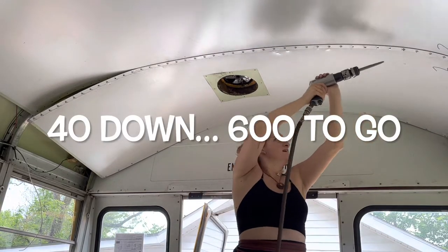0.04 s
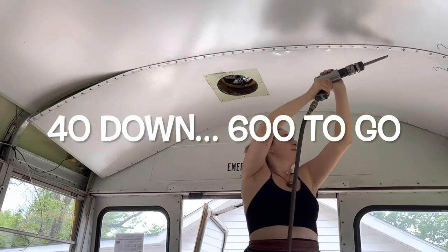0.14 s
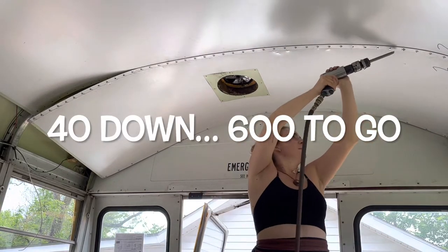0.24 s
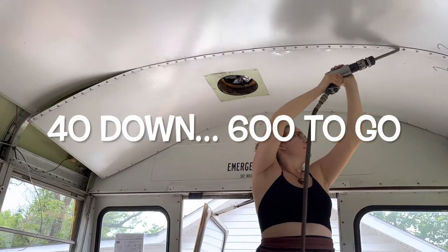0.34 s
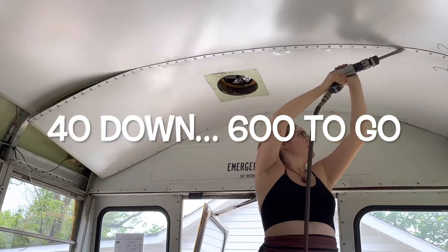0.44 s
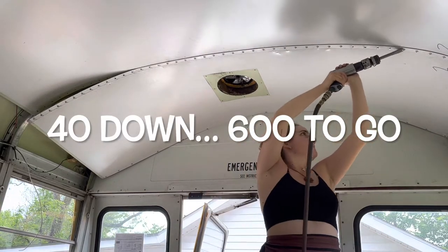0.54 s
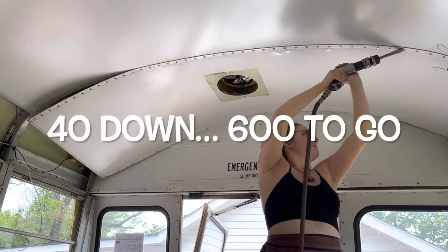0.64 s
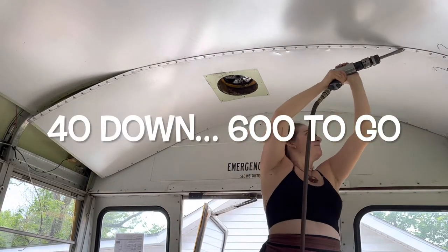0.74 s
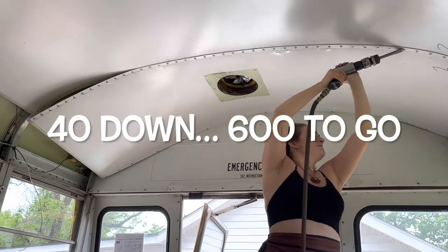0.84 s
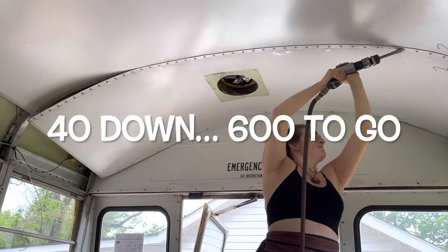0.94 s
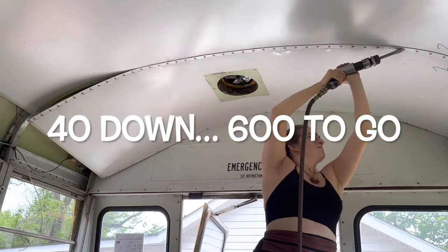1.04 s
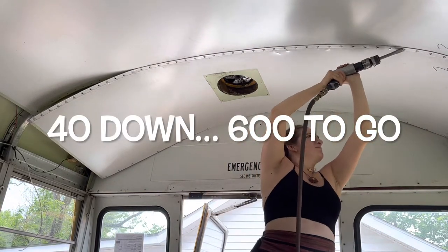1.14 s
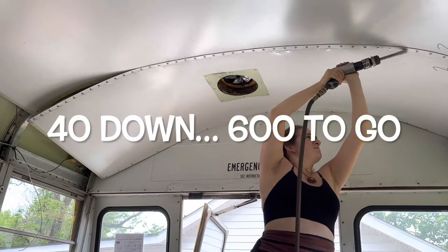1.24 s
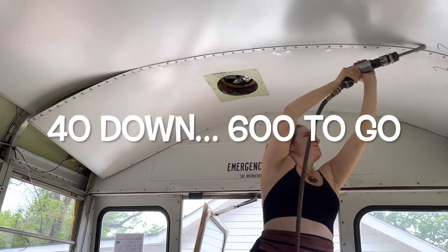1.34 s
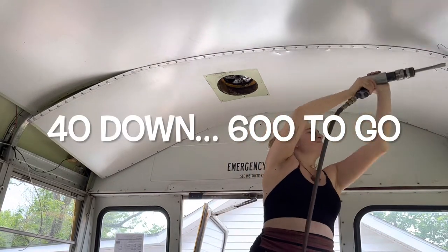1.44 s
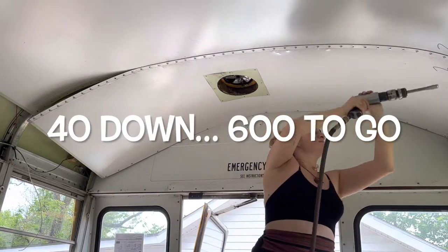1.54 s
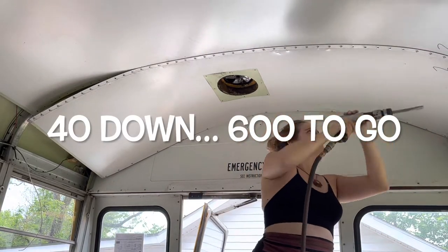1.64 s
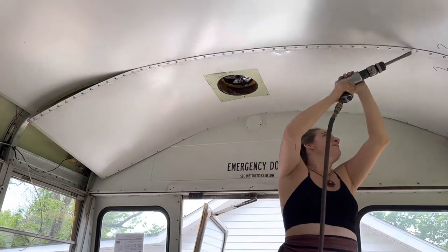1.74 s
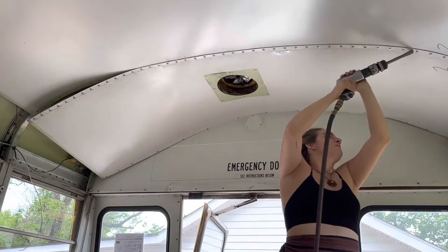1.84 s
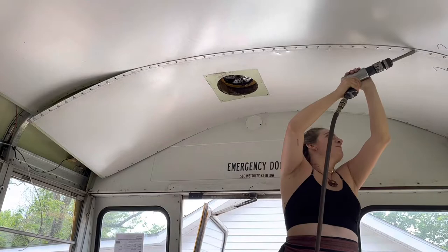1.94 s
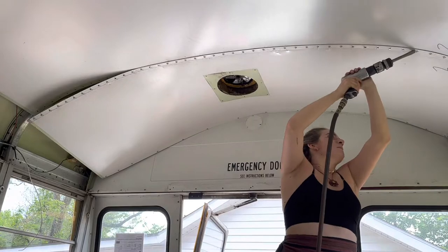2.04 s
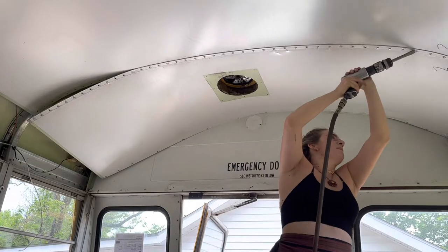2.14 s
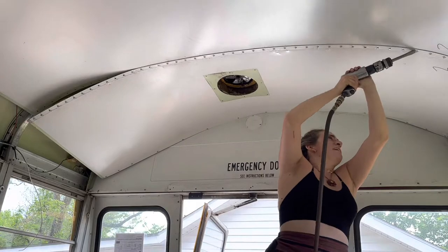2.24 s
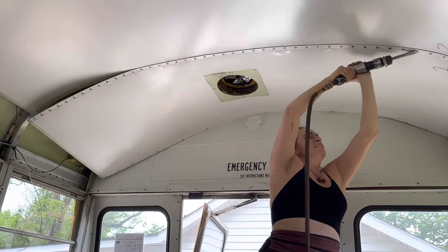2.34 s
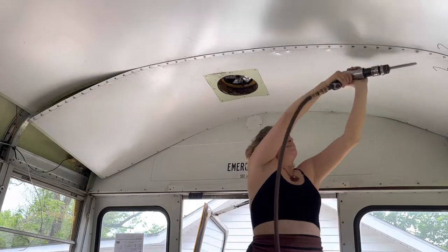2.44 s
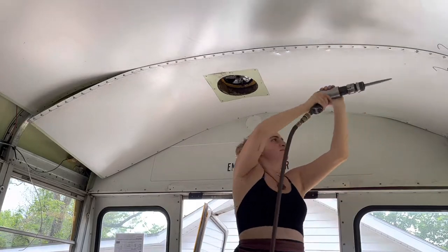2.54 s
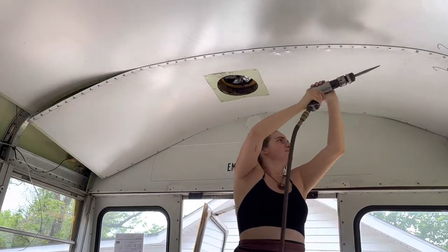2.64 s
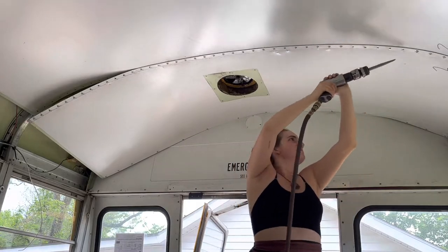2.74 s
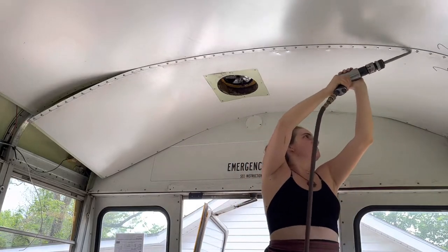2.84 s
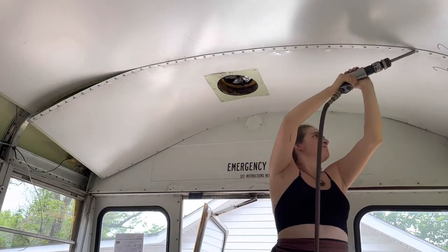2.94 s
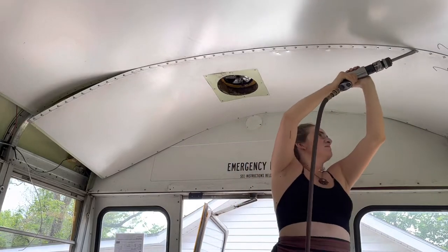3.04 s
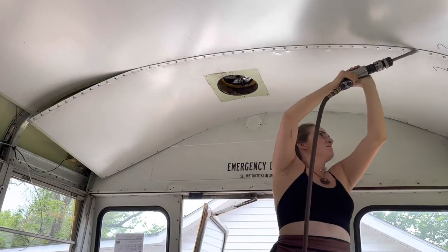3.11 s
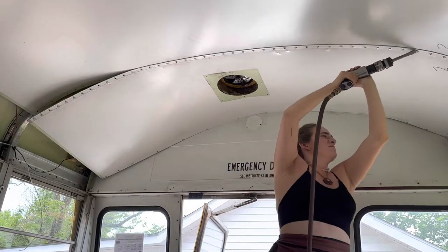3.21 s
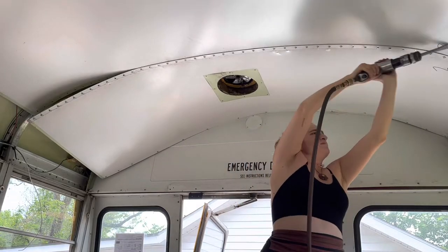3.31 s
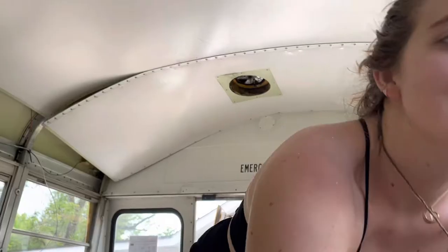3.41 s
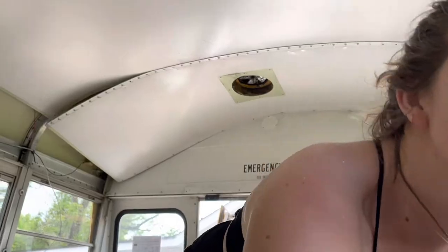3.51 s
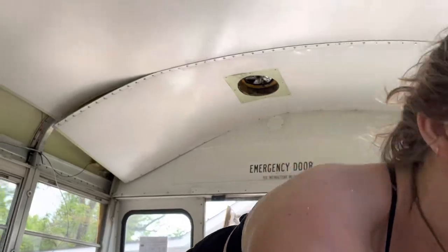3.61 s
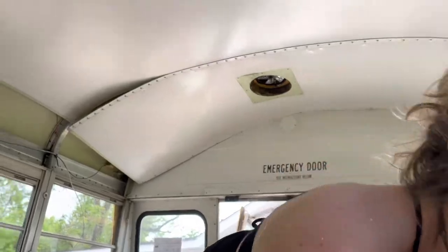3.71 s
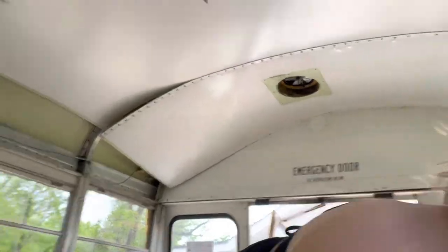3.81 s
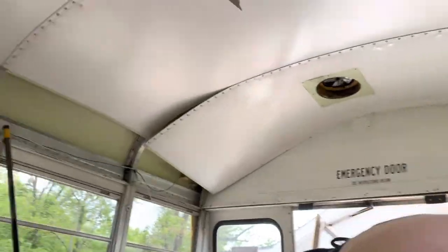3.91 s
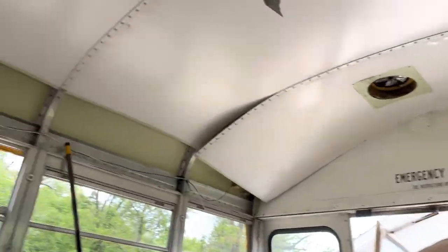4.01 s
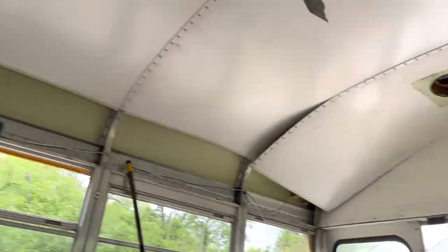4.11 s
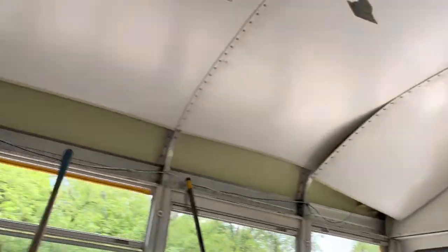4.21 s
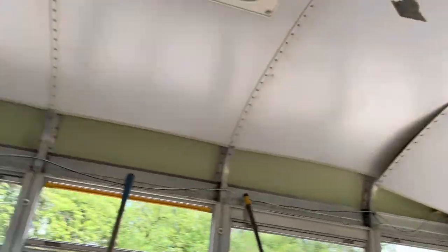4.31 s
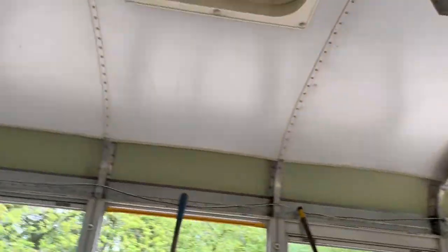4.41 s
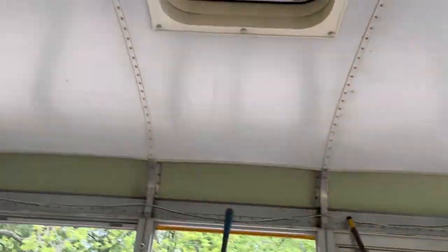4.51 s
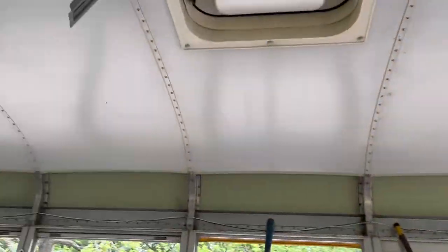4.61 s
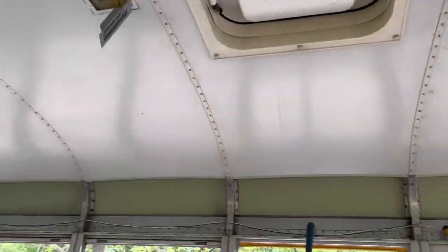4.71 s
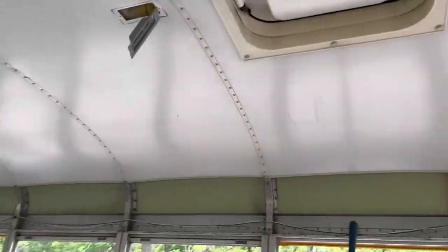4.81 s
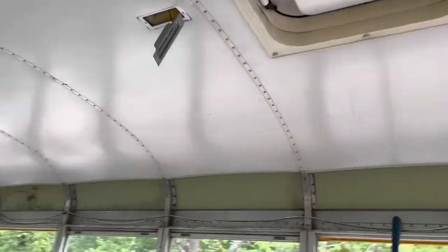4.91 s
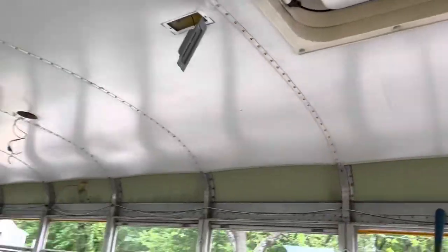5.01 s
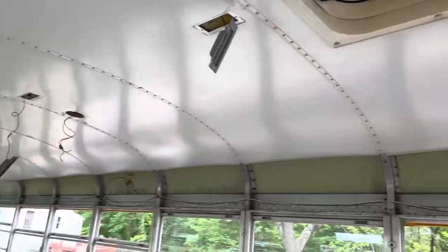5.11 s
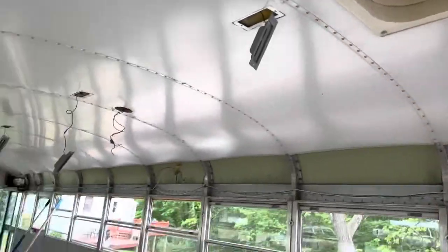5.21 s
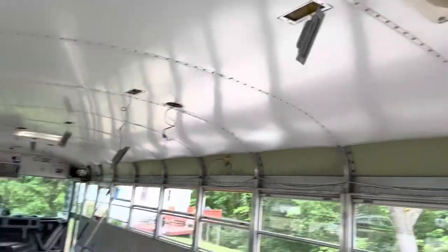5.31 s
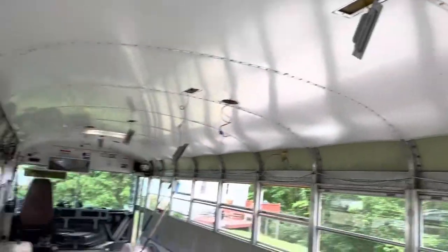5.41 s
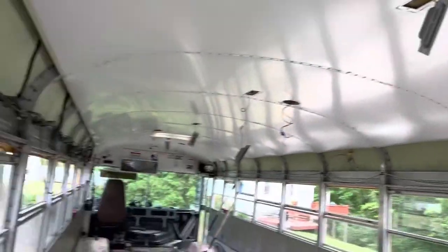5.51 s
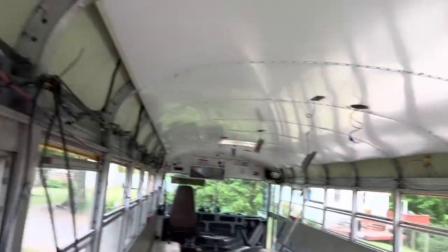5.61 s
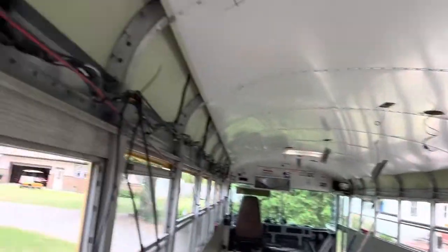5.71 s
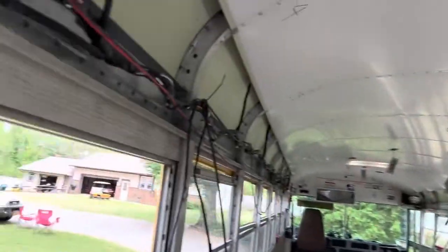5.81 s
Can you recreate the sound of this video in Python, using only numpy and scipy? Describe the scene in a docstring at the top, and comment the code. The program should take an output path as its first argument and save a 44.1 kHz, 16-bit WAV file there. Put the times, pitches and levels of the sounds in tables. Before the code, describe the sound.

Inside a stripped steel bus, an air hammer hammers the roof in three short bursts, followed by heavy clattering footsteps on the floor.

```python
"""Faint hum, grainy rustle and thin tones come first, with soft hose bumps, inside a stripped steel bus.
An air hammer then fires three short bursts against the roof, a few metres from the phone's two ports.
Its blows excite roof bands and falling dent tones; filtered noise makes the air, rustle and rumble.
The chisel taps the panel between bursts, a compressor throbs outside, and feet thud on the floor.
The sound drops out briefly twice."""
import sys
import numpy as np
from scipy import signal
from scipy.fft import rfft, irfft, next_fast_len
from scipy.io import wavfile
from scipy.ndimage import uniform_filter1d

SR = 44100
rng = np.random.default_rng(int(sys.argv[2]) if len(sys.argv) > 2 else 0)


def unload_audio(sound):
    """Save the sound as a 16-bit wav file, at the path given as the first command line argument."""
    columns = np.transpose(np.atleast_2d(sound))
    # keep every value between -1 and 1, then stretch to whole-number steps
    steps = np.round(np.clip(columns, -1, 1) * 32767)
    wavfile.write(sys.argv[1], SR, steps.astype(np.int16))


N = 258293
SIZE = next_fast_len(N + SR)  # FFT length, padded so that tails do not wrap
HZ = np.maximum(np.arange(SIZE // 2 + 1) * SR / SIZE, 1.)
T = np.arange(N) / SR

# Cabin layers over time: start_s, hum_db, rumble_db, rustle_db
CABIN_LEVELS = [(0, -66, -75, -67.5), (0.35, -71, -91, -74.5), (0.45, -65, -64, -69),
                (0.65, -59, -76, -77.5), (1.0, -51.5, -93, -75), (1.72, -57.5, -59, -101),
                (1.85, -73, -56, -67), (1.95, -67, -35.5, -63.5), (2.14, -58, -50.5, -62),
                (2.55, -68.5, -72.5, -66), (2.7, -70.5, -78, -73.5), (2.88, -62, -61, -73),
                (3.06, -44, -71, -81.5), (3.18, -53.5, -60, -61), (3.39, -60.5, -64.5, -73),
                (3.6, -60.5, -60, -76.5), (3.82, -47.5, -45.5, -65), (4.1, -62, -55.5, -74),
                (4.22, -55, -69, -60.5), (4.33, -63.5, -61, -72), (4.5, -67.5, -58.5, -71.5),
                (5.03, -50, -73, -74.5), (5.2, -44.5, -57.5, -53.5), (5.4, -39.5, -43, -58.5),
                (5.65, -51, -59, -69), (5.74, -36, -48, -46), (5.86, -60, -48, -48.5)]
# Heavy steps shaking the floor: start_s, hum_db, rumble_db, scuff_db, rise_s, t60_s
FLOOR_STEPS = [(3.89, -59, -40, -59, 0.015, 0.74), (4.555, -18, -14.5, -65, 0.037, 0.68)]
# Resonances of the hum: pitch_hz, width_hz, relative_db
HUM_MODES = [(73, 22, -5.5), (101, 17, -3.5)]
# Resonances of the rumble: pitch_hz, width_hz, relative_db
RUMBLE_MODES = [(128, 67, -1), (221, 194.5, 1), (276, 267, -2.5)]
# Spectrum of clothes, hose and soles: pitch_hz, relative_db_per_hz
RUSTLE_SPECTRUM = [(150, -4), (300, -8.5), (600, -12), (2000, -11.5), (4800, -16), (7500, -26.5),
                   (10000, -22.5), (12500, -31), (14500, -50)]
# Thin wavering tones: start_s, end_s, pitch_hz, level_db
FAINT_TONES = [(-.1, .36, 533, -81), (-.1, .4, 721, -82), (4.375, 4.55, 985, -70)]

# Soft hose bumps: start_s, click_db, then tail_db, thump_db, ring_db (re click), t60_s, ring_hz
HOSE_BUMPS = [(0.332, -80, 13, 4, 22, 0.5, 540), (0.396, -63, 3, -8, 2, 0.27, 1380),
              (0.431, -70, 12, -4, 16, 0.6, 920), (0.55, -82, 14, -15, 12, 0.5, 900)]
# Chisel and hose against the roof, same columns: start_s, click_db, tail_db, thump_db, ring_db, t60_s, ring_hz
ROOF_TAPS = [(1.052, -68, 6.5, -12.5, -10, 1.2, 1900), (1.076, -48.5, 3.5, -5, 13, 1.2, 810),
             (1.764, -43, -5, -2.5, 14.5, 0.25, 1160), (1.91, -41.5, 0.5, -7.5, 10.5, 0.37, 1030),
             (1.952, -38, -10.5, 5, 9, 0.17, 650), (2.556, -50, 8, -12, -15.5, 0.13, 1042),
             (2.846, -58, 7.5, -11, -13, 0.24, 1080), (2.877, -46.5, 4.5, -22, -15, 0.21, 1030),
             (2.95, -44.5, -2, -18, 2, 0.37, 4700), (3.041, -46.5, -8.5, -19, -8, 0.4, 1040)]
# Feet and hands on floor and fittings: start_s, click_db, tail_db, thump_db, ring_db, t60_s, ring_hz
FLOOR_KNOCKS = [(3.498, -72, 4, 10, -5, 0.35, 1850), (3.655, -38.5, -8, -11.5, -30, 1, 1400),
                (3.809, -55, 4.5, -13, -12, 0.89, 2060), (3.892, -25, -0.5, -1, -8, 0.46, 1220),
                (4.551, -44, 14, -7, 15.5, 0.4, 1600), (4.57, -29.5, 0, 3, 11.5, 0.35, 1590),
                (4.624, -34.5, 7.5, -4, 7, 0.64, 1510), (4.837, -41.5, -18, -7, -9, 0.12, 2900),
                (5.063, -51.5, 4, 23, 14, 0.071, 514), (5.084, -45.5, -4.5, -7, -19.5, 0.15, 1390),
                (5.156, -37, -12.5, -16, -6, 0.11, 3420), (5.317, -54.5, 2, -13, 0.5, 0.44, 1970),
                (5.436, -38.5, -7, -24, 0.5, 0.31, 1360)]
# Tail of a bumped roof: pitch_hz, relative_db_per_hz
BUMP_SPECTRUM = [(300, -14), (600, -3), (950, 0), (1500, -11), (3000, -19), (10000, -30)]
# Tail of a tapped roof, and the click of every strike: pitch_hz, relative_db_per_hz
TAP_SPECTRUM = [(300, -14.5), (700, -6), (1100, -3.5), (2000, -4), (5000, -17.5), (10000, -23.5),
                (14500, -26)]
# Tail of a knocked floor: pitch_hz, relative_db_per_hz
KNOCK_SPECTRUM = [(200, -6.5), (400, 3.5), (900, 0), (1600, -6), (3500, -12.5), (6000, -17.5), (9000, -27),
                  (12500, -22.5), (14000, -47)]
# Roof panel under taps and bumps: pitch_hz, width_hz, relative_db
PANEL_MODES = [(540, 30, -0.5), (714, 36, 1), (920, 52, 1), (1390, 43, -4.5), (2200, 61, -8.5)]
# Floor panels: pitch_hz, width_hz, relative_db
FLOOR_MODES = [(484, 9, -12.5), (787, 17, 11), (1010, 18, -17.5), (1560, 44, -7), (2450, 35, -29),
               (2750, 37, -3), (3420, 170, -4)]
# Loose metal trim answering each strike: pitch_hz, width_hz, relative_db
FITTING_MODES = [(4200, 390, 2.5), (10400, 240, -5.5), (12300, 300, -2.5)]
# Jolts of the loose trim: start_s, level_db, t60_s
TRIM_JOLTS = [(0.398, -55.5, 0.27), (3.895, -63, 0.28), (4.56, -41.5, 0.82)]
# Narrow bands of the shivering trim: pitch_hz, width_hz, relative_db
TRIM_MODES = [(4710, 110, 6), (7340, 190, 4), (9320, 86, 13), (12660, 120, 4)]

# Trigger pulls: air_opens_s, first_blow_s, last_blow_s
TRIGGER_TIMES = [(1.113, 1.136, 1.432), (2.153, 2.164, 2.402), (3.188, 3.2005, 3.276)]
# Bursts: strokes_per_s, return_stroke_db, clean_share (0-1), dent_hz, lead_in_db (before each
# layer's share), lead_in_rise_db_per_s
BURST_SETTINGS = [(99.2, -11, 0.56, 770, -29.5, 15.5), (93.65, -0.5, 0.61, 1050, -27, 499.5),
                  (91.95, -0.5, 0.74, 1200, -30, 398)]
# Roof resonances: pitch_hz, width_hz, relative_db
ROOF_MODES = [(464, 63, -2.5), (861, 54, 0), (900, 32, -3.5), (1176, 71, 4), (1220, 220, -6),
              (2090, 87, -8.5), (2540, 120, -2.5)]
# Sheet under the first, second and third rivet: pitch_hz, relative_db_per_hz
FIRST_SPECTRUM = [(150, -43), (250, -5), (378, -6), (524, -0.5), (800, 5.5), (1660, -8.5), (1930, -5),
                  (5000, -48.5), (6500, -41.5), (11000, -120)]
SECOND_SPECTRUM = [(150, -20), (250, -7), (726, -6.5), (1140, -5.5), (1700, -7.5), (3990, -13.5),
                   (5000, -16.5), (6500, -45), (11000, -120)]
THIRD_SPECTRUM = [(150, -39.5), (250, -18), (579, 0.5), (656, -1), (1340, -3), (2570, -5.5), (5000, -8),
                  (6500, -43.5), (11000, -120)]
# Steady bands of the sheet, one list a rivet: pitch_hz, width_hz, relative_db
SHEET_BANDS = [
    [(274, 33, -10.5), (407, 31, -6.5), (529, 30, 5.5), (635, 20, -13), (780, 25, 0.5), (920, 12, -11),
     (1738, 50, -3.5), (2100, 50, 0)],
    [(270, 35, -3.5), (466, 32, -4.5), (860, 36, -4.5), (964, 40, 1.5), (1186, 18, 4), (1295, 20, 3.5),
     (1370, 45, -0.5)],
    [(690, 25, -1), (981, 61, 6), (1370, 80, -2.5), (2180, 130, -7.5)],
]
# Share of those bands, one value a rivet: relative_db
SHEET_BAND_DB = [-10, -7, -6]
# Low boom behind the roof: pitch_hz, width_hz, relative_db
BOOM_MODES = [(96, 250, -3.5), (139, 100, 2.5), (181, 51, -0.5), (286, 120, -1.5)]
# Spectrum of the escaping air: pitch_hz, relative_db_per_hz
AIR_SPECTRUM = [(300, -30.5), (1000, -0.5), (2000, -0.5), (4500, -1), (7000, -4), (11000, -4.5),
                (14500, -6), (16000, -20.5)]
# Roof, boom and air, one row a burst: settled_db, first_blows_extra_db, t60_s (after the last blow)
ROOF_EFFORT = [(-35.5, 17.5, 0.56), (-17, 2, 0.095), (-28.5, 11.5, 0.3)]
BOOM_EFFORT = [(-49.5, 24.5, 0.31), (-20, 1, 0.06), (-29, -14, 0.31)]
AIR_EFFORT = [(-25, 9.9, 0.41), (-20, 2.7, 0.22), (-19, 2, 0.65)]
# Short falling tones of hammer blows, a knock, a bump and a floor thud:
# start_s, peak_db (before decay), settled_hz, decay_s
FALLING_TONES = [(1.114, -20, 328, 0.0092), (1.1365, -9.5, 690, 0.0023), (1.1445, -2.5, 250, 0.0043),
                 (1.2265, -3.5, 509, 0.0035), (1.952, -23.5, 403, .014), (2.171, -7, 384, .003),
                 (2.2015, -7.5, 328.5, .003), (2.2132, -6.5, 299.4, 0.0025), (3.201, -8, 900, .004),
                 (3.2433, -8.5, 1250, .002), (4.586, -15, 139, 0.0092), (5.162, -37.5, 478, 0.0044)]
# Multiples 4, 5, 6 ... of the tool's cycle: relative_db
DRONE_MULTIPLES = [-52, -47, -40, -47, -45, -41, -39, -36, -41, -43, -40, -46, -45, -41]
# Compressor over time: start_s, level_db
COMPRESSOR_LEVELS = [(1.74, -52.5), (1.783, -36.5), (2.0, -36), (2.3, -37.5), (2.5, -54.5), (2.82, -53.5),
                     (2.95, -39), (3.2, -39.5), (3.3, -59.5)]
# Compressor tank: pitch_hz, width_hz, relative_db
TANK_MODES = [(161.1, 7, 8), (204, 94, -14.5), (101.5, 9.4, -22)]
# Motor whine: pitch_hz, level_db
MOTOR_TONES = [(1247, -82), (1867, -86)]
# Modes of a steel frame on the floor: pitch_hz, relative_db, t60_s
FRAME_MODES = [(221, -1.5, .5), (447, -2, .4), (877, -5, .25), (1174, -13, .2), (1308, -14, .2),
               (1529, -12, .14), (2250, -17, .16), (2449, -14, .18), (2690, -14, .15), (2869, -17, .15),
               (3252, -15, .14), (3537, -15, .14), (3978, -16, .13)]
# Kicks at the frame: start_s, level_db
FRAME_KICKS = [(3.893, -26), (3.906, -25)]

# Stretches between dropouts: back_s, full_s, fade_starts_s, silent_s, phase_column
HEARD_STRETCHES = [(-1, -.5, 1.69, 1.73, 1), (1.73, 1.75, 3.33, 3.365, 2), (3.35, 3.38, 6, 7, 1)]
# The two microphone ports: pitch_hz, likeness (-1 to 1)
PORT_LIKENESS = [(60, .975), (250, .9), (450, .74), (750, .45), (1200, .1), (2200, 0), (4000, .05),
                 (6000, .42), (8000, .75), (9000, .72), (12000, .5), (15000, .8)]
# Phase by which left leads: pitch_hz, outer_stretches_rad, middle_stretch_rad
PORT_PHASE = [(0, 0, 0), (1300, 0, 0), (3600, .5, -.5), (5000, .5, .5), (6700, -1.1, .5), (7750, -3.14, 0),
              (8900, -3.14, .5), (11100, -6.2, -1), (13000, -6.4, -1), (14600, -9.2, -3),
              (16000, -9.5, -3.2)]

SETTLE_S, BITE_S = 0.11, 0.0022  # the tool settles on the rivet; the first blows build up
LEAD_ROOF_DB, LEAD_BOOM_DB, LEAD_AIR_DB = 2.5, -7, 0.5  # layer shares between trigger and first blow
LINGER_DB, LINGER_T60_S = -21.5, 0.49  # slower second part of each decay
REBOUND_S, REBOUND_DB, REBOUND_PITCH = 0.00454, -4, .72  # a later, lower dent tone; pitch is a ratio
DENT_S, DENT_SCATTER, DENT_SAG = .0019, .16, .3  # decay; pitch scatter in log units; starting sharpness
WHISTLE_HZ, WHISTLE_WIDTH_HZ = 1918, 70
WHISTLE_DB, WHISTLE_RISE_DB_S, WHISTLE_T60_S = -26, 70, .36
CYCLE_HZ = 49.9
DRONE_DB, DRONE_FROM_S, DRONE_RISE_S, DRONE_T60_S = 1.5, 1.2, .06, 0.19
PISTON_HZ = 22.38
FRAME_RATTLE_DB = 3.5
CABIN_T60_S, CABIN_WET_DB = 0.12, -5.5
TOP_HZ = 15800


def undb(db):
    """Decibels to gain."""
    return 10 ** (np.asarray(db) / 20)


def unit(x):
    """Scale to rms 1."""
    return x / np.sqrt(np.mean(x ** 2))


def along(table):
    """Read a (pitch_hz, value) table at every bin, straight on a log axis."""
    points = np.array(table)
    return np.interp(np.log(HZ), np.log(np.maximum(points[:, 0], 1.)), points[:, 1])


def ring(x, modes):
    """Pass a sound through two-pole resonances summed with alternating sign."""
    gain = 0
    for k, (hz, width, db) in enumerate(modes):
        band = 1j * HZ * width
        gain = gain + (-1) ** k * undb(db) * band / (hz ** 2 - HZ ** 2 + band)
    return irfft(rfft(x, SIZE) * gain, SIZE)[:len(x)]


def colour(x, table):
    """Causal (minimum-phase) filter with the given spectrum, from the folded cepstrum."""
    cepstrum = irfft(along(table) * np.log(10) / 20, SIZE)
    cepstrum[1:SIZE // 2] *= 2
    cepstrum[SIZE // 2 + 1:] = 0
    return irfft(rfft(x, SIZE) * np.exp(rfft(cepstrum)), SIZE)[:len(x)]


def shaped(x, table):
    """Colour that keeps the level of white noise."""
    return colour(x, table) / np.std(colour(rng.standard_normal(N), table))


def gains(table, column):
    """A dB column of a timed table as a gain curve, all but silent outside it."""
    points = np.array(table)
    return undb(np.interp(T, points[:, 0], points[:, column], -200, -200))


def walk(rate):
    """Random levels held 1 / rate s and slewed; spread near 1."""
    hold = int(SR / rate)
    held = np.repeat(rng.standard_normal(N // hold + 1), hold)
    return np.sqrt(3 / 2) * uniform_filter1d(held, hold)[:N]


def dying(since, t60):
    """Gain 1 until a moment, then 60 dB less every t60 s."""
    return undb(-60 * np.maximum(since, 0) / max(t60, .01))


def restless(column):
    """Level of one cabin layer: its slow curve plus the shudder after each heavy step."""
    level = gains(CABIN_LEVELS, column)
    for step in FLOOR_STEPS:
        since = T - step[0]
        level = level + undb(step[column]) * np.tanh(np.maximum(since, 0) / step[4]) * dying(since, step[5])
    return level


def cabin():
    """Hum and rumble of the body in the breeze; grainy rustle of clothes, hose and soles."""
    hum = unit(ring(ring(rng.standard_normal(N), HUM_MODES), [(86, 160, 0)]))
    rumble = unit(ring(ring(rng.standard_normal(N), RUMBLE_MODES), [(200, 750, 0)]))
    rustle = unit(colour(rng.standard_normal(N), RUSTLE_SPECTRUM)) * undb(2 * walk(70))
    return hum * restless(column=1) + rumble * restless(column=2) + rustle * restless(column=3)


def tones():
    """Thin sine tones of wavering level that come and go softly."""
    out = np.zeros(N)
    for start, end, hz, db in FAINT_TONES:
        edges = np.clip(np.minimum(T - start, end - T) / 0.015, 0, 1)
        out += np.sqrt(2) * np.sin(2 * np.pi * hz * T) * undb(db + 2 * walk(20)) * edges
    return out


def strikes(table, body, modes, click_s, thump_hz, thump_width, ring_width):
    """Each strike: a click with a noisy tail, a thump in the body and a brief ring at its own pitch."""
    click, crack, pitched = np.zeros(N), np.zeros(N), np.zeros(N)
    t = T[:SR]
    for s, db, tail_db, thump_db, ring_db, t60, ring_hz in table:
        i = int(s * SR)
        fade = dying(t, t60)
        noise = rng.standard_normal((2, len(t)))
        boards = [signal.lfilter(*signal.iirpeak(k * thump_hz, thump_hz / thump_width, SR), noise[1])
                  for k in (1, 2.1)]
        thump = unit(boards[0] + undb(-11.5) * boards[1])
        # the body takes a few cycles to swing up
        thump = undb(thump_db) * thump * fade * np.tanh(t * thump_hz / 2)
        bell = np.exp(-np.pi * ring_width * t) * np.sin(2 * np.pi * ring_hz * t) * np.tanh(t / 0.00054)
        contact = noise[0] * t / click_s * np.exp(1 - t / click_s)
        tail = noise[0] * fade * np.tanh(t / 0.0085)
        click[i:i + SR] += (undb(db) * contact)[:N - i]
        crack[i:i + SR] += (undb(db + tail_db) * tail)[:N - i]
        pitched[i:i + SR] += (undb(db) * (thump + undb(ring_db) * bell))[:N - i]
    fittings = undb(-17.5) * ring(crack, FITTING_MODES)
    panels = undb(1.0) * ring(crack, modes)
    return shaped(click, TAP_SPECTRUM) + shaped(crack, body) + fittings + panels + pitched


def bumps():
    """The hose bumps the roof softly, with a long narrow ring."""
    return strikes(HOSE_BUMPS, BUMP_SPECTRUM, PANEL_MODES, click_s=0.002, thump_hz=540,
                   thump_width=20, ring_width=14)


def trim():
    """Loose trim shivers in narrow high bands after a jolt."""
    shake = np.zeros(N)
    for s, db, t60 in TRIM_JOLTS:
        shake += undb(db) * np.tanh(np.maximum(T - s, 0) / 0.012) * dying(T - s, t60)
    return unit(ring(rng.standard_normal(N), TRIM_MODES)) * shake


def taps():
    """Chisel and hose tap the roof: sharp contact on a thin panel."""
    return strikes(ROOF_TAPS, TAP_SPECTRUM, PANEL_MODES, click_s=0.00096, thump_hz=456,
                   thump_width=26, ring_width=130)


def effort(rows, lead_db):
    """Gain of each burst: a soft lead-in, hard first blows that settle, a decay in two slopes."""
    out = []
    for (opens, start, stop), burst, (db, first_db, t60) in zip(TRIGGER_TIMES, BURST_SETTINGS, rows):
        lead_in_db, rise_db_s = burst[4:]
        since = np.maximum(T - start, 0)
        settling = np.exp(-np.minimum(since, stop - start) / SETTLE_S)
        held = undb(db + first_db * settling) * np.tanh(since / BITE_S)
        decay = np.hypot(dying(T - stop, t60), undb(LINGER_DB) * dying(T - stop, LINGER_T60_S))
        lead = undb(lead_db + lead_in_db + rise_db_s * np.clip(T - opens, 0, start - opens))
        lead = lead * (T > opens) * dying(T - start, 0.018)
        # the next dropout ends the burst
        cut = min(silent for _, _, _, silent, _ in HEARD_STRETCHES if silent > start)
        out.append(np.hypot(held * decay, lead) * (T < cut))
    return out


def hammer_blows():
    """Uneven blows and return strokes, the quivering dents they leave, and the share of clean blows."""
    blows, share, dents = np.zeros(N), np.zeros(N), np.zeros(N)
    t = T[:SR // 20]
    sagging = t * (1 + DENT_SAG * np.exp(-t / DENT_S))  # each dent starts sharp and falls in pitch
    quivers = (0, 0, 1), (int(REBOUND_S * SR), REBOUND_DB, REBOUND_PITCH)  # delay, dB, pitch ratio
    for (_, start, stop), (rate, back_db, clean, dent_hz, _, _) in zip(TRIGGER_TIMES, BURST_SETTINGS):
        chance = rng.standard_normal((60, 3))
        k = np.arange(len(chance))
        s = start + (k + .05 * chance[:, 0] * (k > 0)) / rate
        keep = s < stop
        at = (s[keep] * SR).astype(int)
        # every second stroke is a return stroke
        blows[at] = undb(back_db * (k % 2) + 2.4 * chance[:, 1])[keep]
        for i, hz in zip(at, dent_hz * np.exp(DENT_SCATTER * chance[:, 2])):
            for late, db, pitch in quivers:
                quiver = np.exp(-t / DENT_S) * np.sin(2 * np.pi * pitch * hz * sagging)
                dents[i + late:i + late + len(t)] += blows[i] * undb(db) * quiver
        share += clean * (T > start) * (T < stop + 1 / rate)
    return blows, np.clip(share, 0, 1), dents


def whistle():
    """A narrow band of noise swells up to the first burst's last blow, then dies away."""
    opens, start, stop = TRIGGER_TIMES[0]
    since = T - stop
    level = undb(WHISTLE_DB + WHISTLE_RISE_DB_S * np.minimum(since, 0)) * dying(since, WHISTLE_T60_S)
    sounding = (T > start) * (T < HEARD_STRETCHES[0][3])
    return unit(ring(rng.standard_normal(N), [(WHISTLE_HZ, WHISTLE_WIDTH_HZ, 0)])) * level * sounding


def hammer():
    """Blows and return strokes ring the roof, loose sheets rattle, air puffs out at every stroke."""
    blows, share, dents = hammer_blows()
    # each blow is a short ragged contact: the bit chatters for a few ms
    chatter = signal.lfilter([1], [1, -np.exp(-1 / (0.0037 * SR))], blows)
    contact = chatter / np.sqrt(uniform_filter1d(chatter ** 2, SR // 30) + 1e-6)
    # clean blows pulse the noise; the rest is a continuous rattle
    drive = (share * contact + np.sqrt(1 - share ** 2)) * rng.standard_normal(N)
    modes = undb(-8.0) * unit(ring(drive, ROOF_MODES)) + undb(18.0) * share * dents
    spectra = FIRST_SPECTRUM, SECOND_SPECTRUM, THIRD_SPECTRUM
    roof = np.zeros(N)
    for spectrum, bands, band_db, gain in zip(spectra, SHEET_BANDS, SHEET_BAND_DB,
                                              effort(ROOF_EFFORT, LEAD_ROOF_DB)):
        sheet = unit(colour(drive, spectrum)) + undb(band_db) * unit(ring(drive, bands))
        roof += (modes + sheet) * gain
    boom = unit(ring(ring(drive, BOOM_MODES), [(168, 170, 0)])) * sum(effort(BOOM_EFFORT, LEAD_BOOM_DB))
    puff = 0.5 * share * contact + np.sqrt(1 - (1.3 * share) ** 2)
    flow = sum(effort(AIR_EFFORT, LEAD_AIR_DB))
    air = puff * unit(colour(rng.standard_normal(N), AIR_SPECTRUM)) * flow
    return roof + boom + air + whistle()


def falling_tones():
    """Short low tones falling in pitch: hammer blows, a knock, a bump and a floor thud."""
    out = np.zeros(N)
    for s, db, hz, decay in FALLING_TONES:
        t = np.maximum(T - s, 0)
        fade = np.exp(-t / decay)
        out += undb(db) * fade * np.sin(2 * np.pi * hz * t * (1 + DENT_SAG * fade))
    return out


def drone():
    """The piston cycle, even once settled on the first rivet, hums through the sheet in multiples."""
    phase = 2 * np.pi * np.cumsum(CYCLE_HZ * (1 + .002 * walk(8))) / SR
    turns = 2 * np.pi * rng.random(len(DRONE_MULTIPLES))
    stack = np.zeros(N)
    for k, db in enumerate(DRONE_MULTIPLES):
        stack += undb(db + 1.5 * walk(12)) * np.sin((k + 4) * phase + turns[k])
    rise = np.tanh(np.maximum(T - DRONE_FROM_S, 0) / DRONE_RISE_S)
    return undb(DRONE_DB) * np.sqrt(2) * stack * rise * dying(T - TRIGGER_TIMES[0][2], DRONE_T60_S)


def compressor():
    """Slightly uneven piston strokes ring the tank; the motor whines faintly."""
    strokes = np.zeros(N)
    s = np.arange(0, N / SR - 1, 1 / PISTON_HZ)
    chance = rng.standard_normal((len(s), 2))
    at = ((s + .001 * np.abs(chance[:, 0])) * SR).astype(int)
    strokes[at] = undb(2.2 * chance[:, 1])
    throb = unit(ring(ring(strokes, TANK_MODES), [(159, 53, 0)])) * gains(COMPRESSOR_LEVELS, 1)
    motor = sum(undb(db) * np.sin(2 * np.pi * hz * T) for hz, db in MOTOR_TONES)
    return throb + motor * (T > COMPRESSOR_LEVELS[0][0]) * (T < COMPRESSOR_LEVELS[-1][0])


def knocks():
    """Feet and hands strike floor and fittings: a low, narrow thump under the click."""
    return strikes(FLOOR_KNOCKS, KNOCK_SPECTRUM, FLOOR_MODES, click_s=0.0013, thump_hz=196.3,
                   thump_width=5.3, ring_width=66)


def frame():
    """Each kick rings the frame's modes; loose joints make every mode flutter."""
    out = np.zeros(N)
    for s, db in FRAME_KICKS:
        since = np.maximum(T - s, 0)
        for hz, mode_db, t60 in FRAME_MODES:
            flutter = undb(mode_db + FRAME_RATTLE_DB * walk(60))
            out += undb(db) * flutter * dying(since, t60) * np.sin(2 * np.pi * hz * since)
    return out


def echoes(dry):
    """Two unrelated diffuse tails of the steel cabin, redrawn every 60 ms to avoid fixed coloration."""
    hop, size = 2646, 16384  # samples
    starts = [i for i in range(-hop, N, hop) if dry[max(i, 0):i + 2 * hop].any()]
    padded = np.pad(dry, (hop, 2 * hop))
    window = np.sin(np.pi * np.arange(2 * hop) / (2 * hop))
    pieces = np.array([padded[i + hop:i + 3 * hop] for i in starts]) * window
    t = T[:size - 2 * hop]
    tails = rng.standard_normal((2, len(starts), len(t))) * undb(-60 * t / CABIN_T60_S)
    tails /= np.sqrt(np.sum(tails ** 2, axis=2, keepdims=True))
    wet = irfft(rfft(pieces, size) * rfft(tails, size), size)
    out = np.zeros((2, N + hop + size))
    for k, i in enumerate(starts):
        out[:, i + hop:i + hop + size] += wet[:, k]
    return out[:, hop:hop + N]


def ports(dry, column):
    """The ports share the direct sound and one tail, and oppose the other tail."""
    shared, opposed = rfft(echoes(dry), SIZE)
    # long waves fill the cabin as a whole and echo little
    shared = rfft(dry, SIZE) + undb(CABIN_WET_DB) * shared * HZ / np.hypot(HZ, 250)
    like = np.clip(along(PORT_LIKENESS), -1, 1)
    shared = shared * np.sqrt((1 + like) / 2)
    opposed = opposed * np.sqrt((1 - like) / 2)
    phase = np.array(PORT_PHASE)
    lead = np.exp(.5j * np.interp(HZ, phase[:, 0], phase[:, column]))
    return irfft(np.array([(shared + opposed) * lead, (shared - opposed) / lead]), SIZE)[:, :N]


def scene():
    """All sources in the cabin; each dropout also ends the echoes."""
    dry = cabin() + tones() + bumps() + trim() + taps() + hammer() + falling_tones() + drone()
    dry = dry + compressor() + knocks() + frame()
    heard = 0
    for back, full, fade, silent, column in HEARD_STRETCHES:
        inside = (T >= full - (full - back) / 2) & (T < silent)
        level = np.interp(T, [back, full, fade, silent], [0, 1, 1, 0])
        heard = heard + ports(dry * inside, column) * level
    return heard


def record(dry):
    """The phone rounds the loudest peaks, drops the deepest bass and cuts the top."""
    rounded = np.tanh(1.008 * dry) / 1.342
    x = signal.sosfilt(signal.butter(2, 50, "high", fs=SR, output="sos"), rounded)
    return signal.sosfilt(signal.ellip(8, .2, 70, TOP_HZ, fs=SR, output="sos"), x)


dry = scene()
out = record(dry)
unload_audio(out)
```